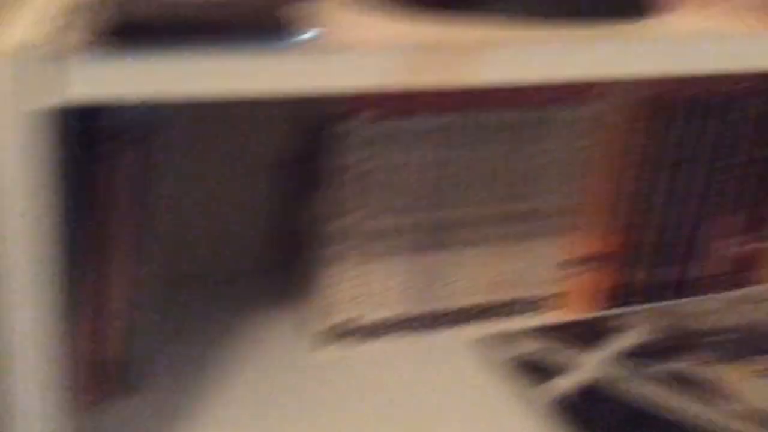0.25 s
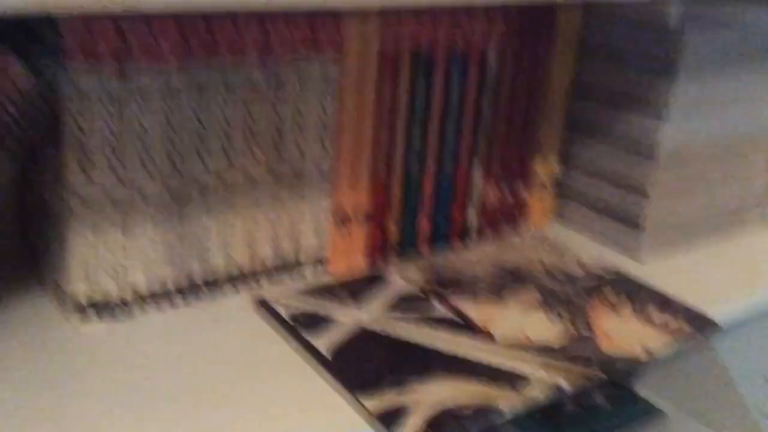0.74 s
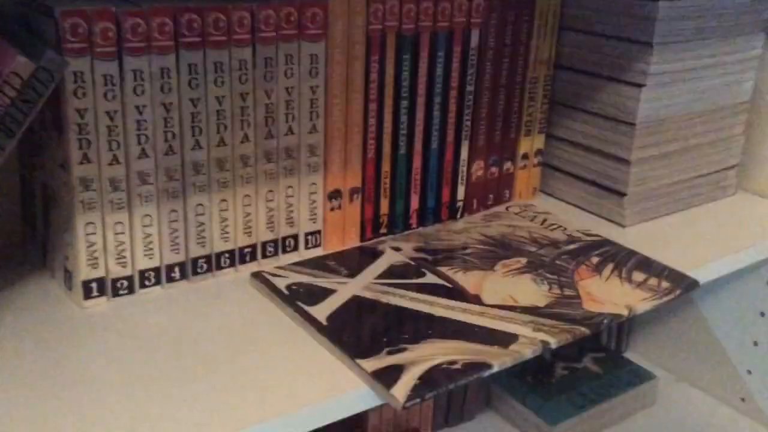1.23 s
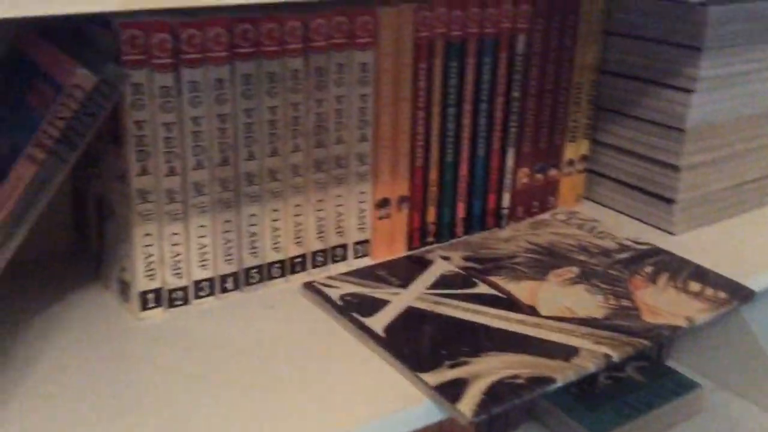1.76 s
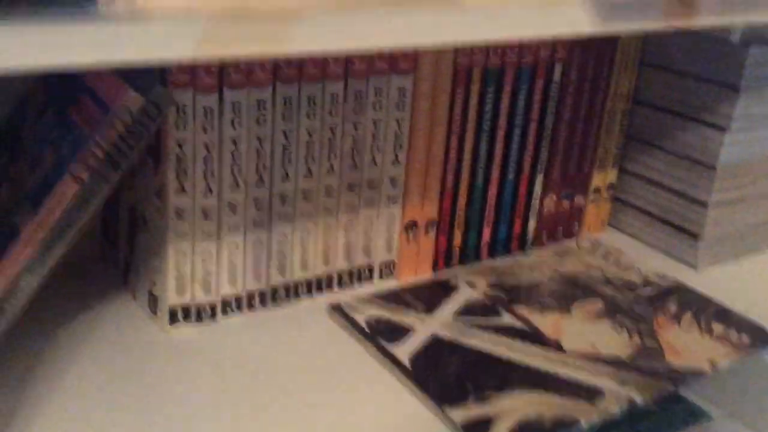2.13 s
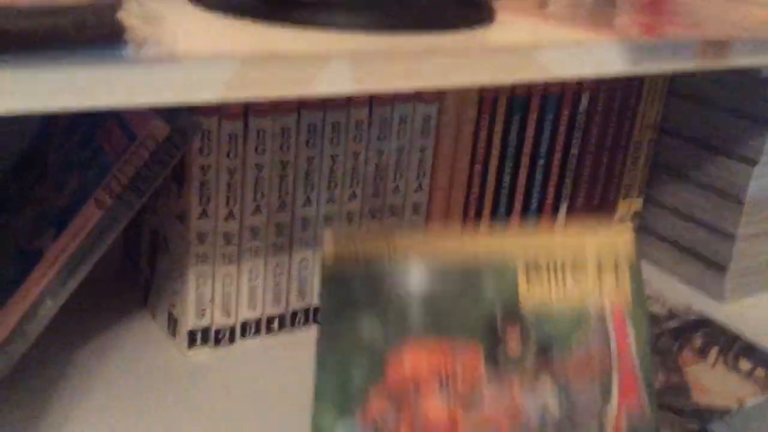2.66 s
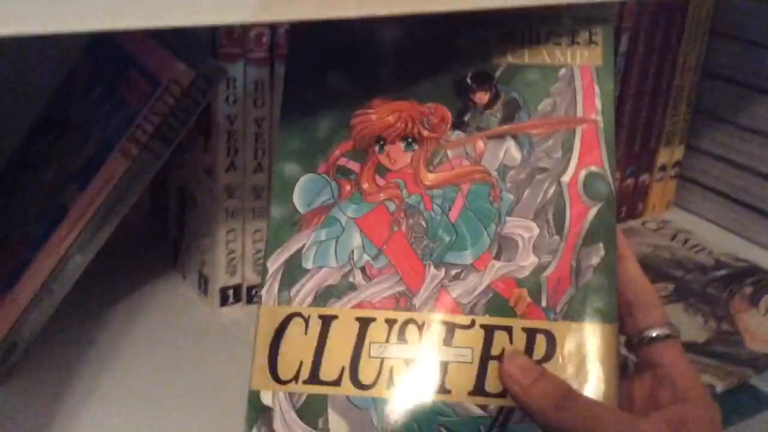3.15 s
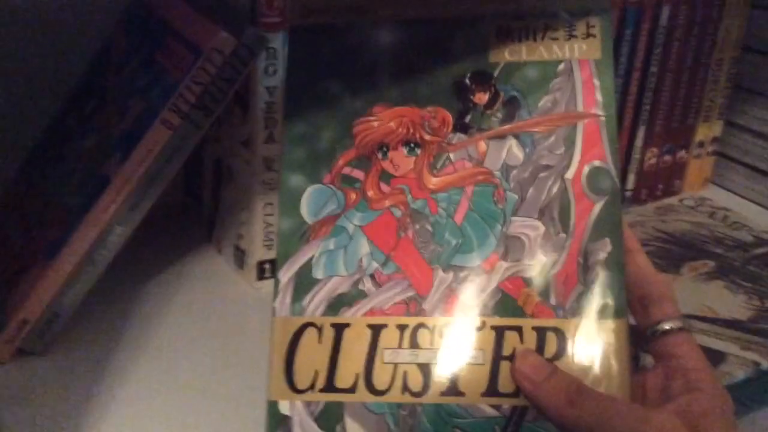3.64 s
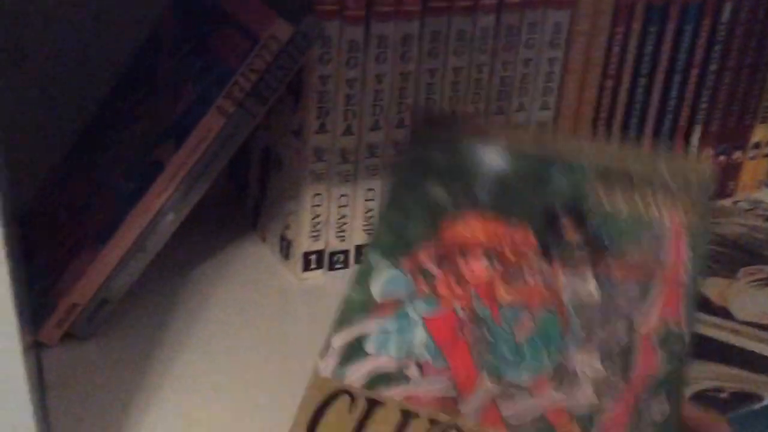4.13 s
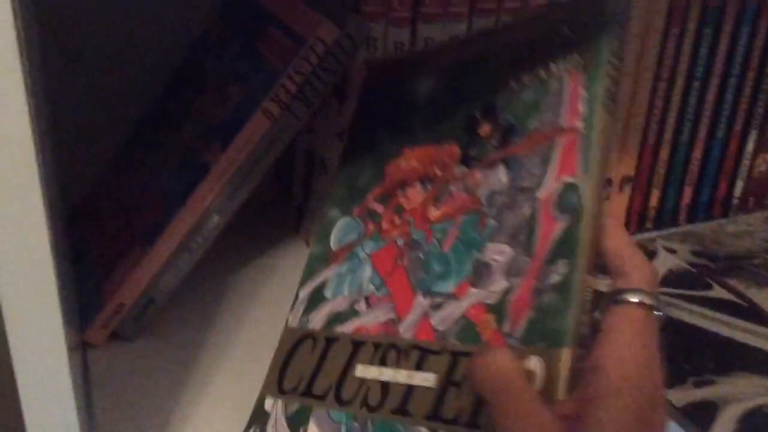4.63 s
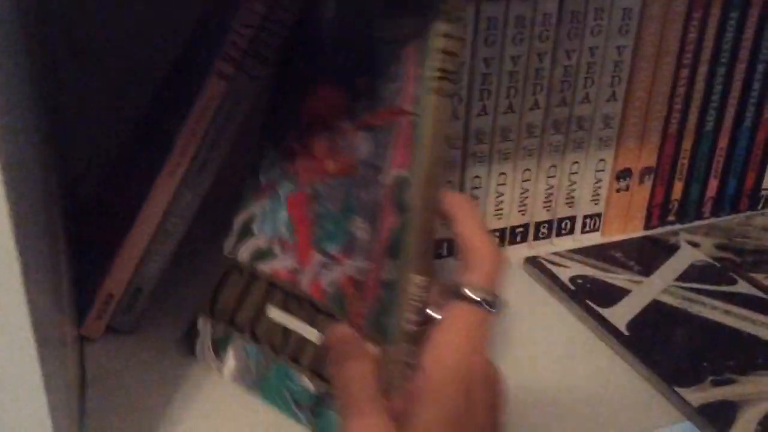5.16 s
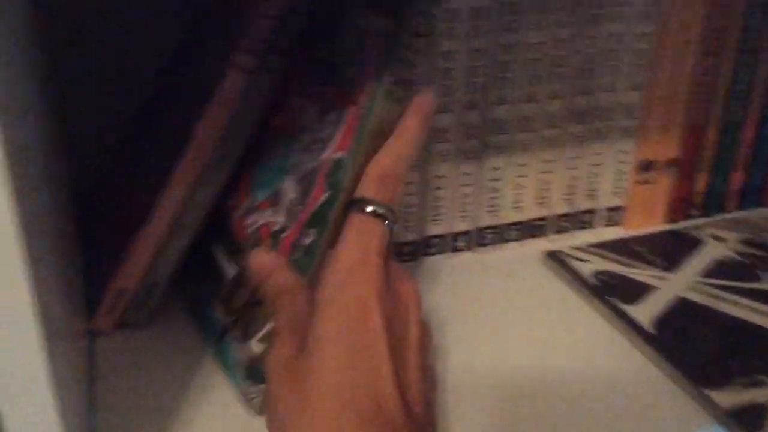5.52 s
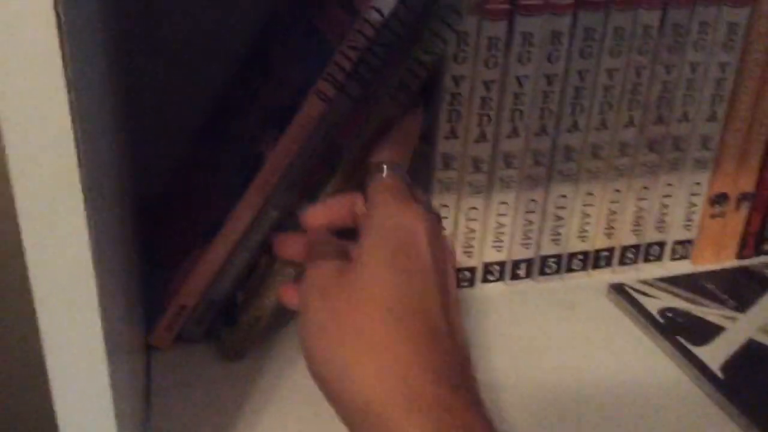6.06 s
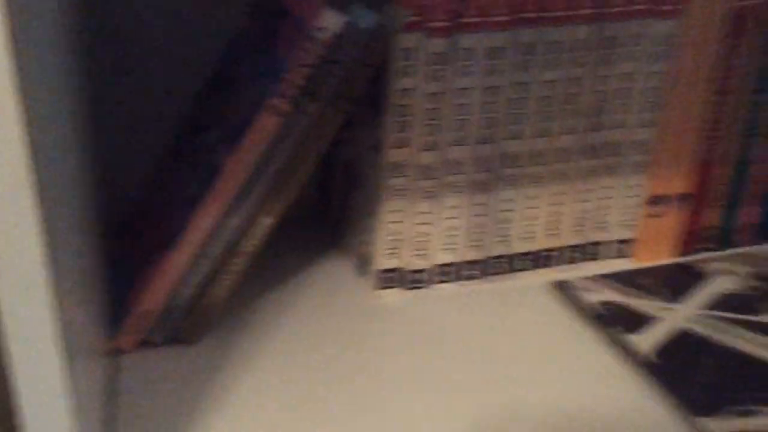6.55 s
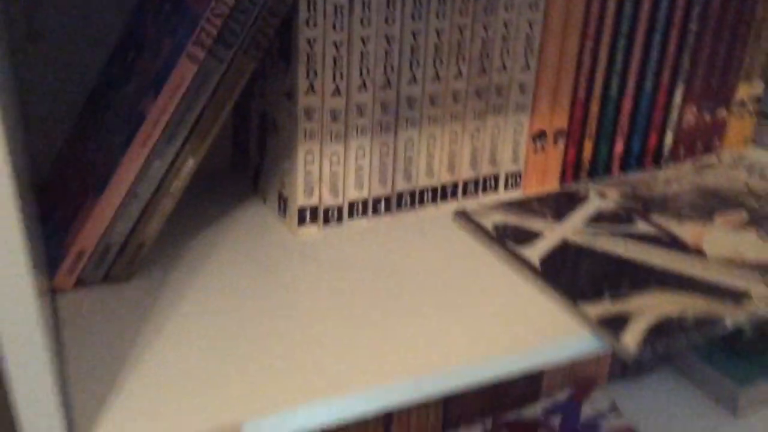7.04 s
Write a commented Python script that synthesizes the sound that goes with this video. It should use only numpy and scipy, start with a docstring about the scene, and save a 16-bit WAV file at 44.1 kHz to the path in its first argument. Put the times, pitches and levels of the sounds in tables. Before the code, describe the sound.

A book lands with a hard woody knock on a shelf, then faint cover creaks, clicks and grainy paper sliding in a quiet room.

```python
"""Paperbacks in a shelf compartment, close to a hand-held camera in a quiet room.
A book is put down with a knock, a damped swing plus scuffing noise that rings the shelf, and its cover clicks.
Another is gripped with a creak, stick-slip pulses through cover resonances, over the dull noise of skin.
It is set on the board and pushed in beside its neighbours, grainy paper noise with tiny catches and clicks.
Throughout, low damped thumps are the hand bumping the camera, over room rumble, a low drone and hiss."""
import sys
import numpy as np
from scipy import signal
from scipy.fft import rfft, irfft, next_fast_len
from scipy.io import wavfile
from scipy.ndimage import uniform_filter1d, map_coordinates

SR = 44100
rng = np.random.default_rng(int(sys.argv[2]) if len(sys.argv) > 2 else 0)


def waveform_to_disk(signal):
    """Save audio, clipped to [-1, 1], as 16-bit WAV at the path in sys.argv[1]."""
    frames = np.transpose(np.atleast_2d(signal))
    scaled = np.clip(frames, -1, 1) * 32767
    samples = np.round(scaled).astype(np.int16)
    wavfile.write(sys.argv[1], SR, samples)


N = 321489  # length in samples


def amp(db):
    """Decibels to gain."""
    return 10 ** (np.asarray(db) / 20)


def unit(x):
    """Scaled to rms 1."""
    return x / np.sqrt(np.mean(x ** 2) + 1e-20)


def along(points, hz):
    """(frequency [Hz], value) points read on a log frequency axis."""
    f, v = np.transpose(points)
    return np.interp(np.log(hz + 1), np.log(f + 1), v)


def curve(rows, outside=None):
    """(time [s], value) rows joined by straight lines, one value per sample."""
    return np.interp(np.arange(N) / SR, *np.transpose(rows), left=outside, right=outside)


STROKE_ROUNDNESS = 0.63  # power of the half sine; below 1 it is fuller


def strokes(rows):
    """Gain of (start [s], length [s], level [dB]) strokes that swell and ebb as the hand moves."""
    t = np.arange(N) / SR
    gain = np.zeros(N)
    for start, length, db in rows:
        progress = np.clip((t - start) / length, 0, 1)
        gain += amp(db) * np.abs(np.sin(np.pi * progress)) ** STROKE_ROUNDNESS
    return gain


def wobble(rate, size=N):
    """A smooth random curve, rate knots a second."""
    knots = rng.standard_normal(size // 50)
    return map_coordinates(knots, [np.arange(size) * rate / SR])


def filtered(x, response):
    """x times a complex response of frequency."""
    m = next_fast_len(len(x) + SR // 4)  # padded so that tails do not wrap round
    return irfft(rfft(x, m) * response(np.fft.rfftfreq(m, 1 / SR)), m)[:len(x)]


def resonance(f, hz, width):
    """Causal response of one resonance."""
    return 1j * f * width / (hz * hz - f * f + 1j * f * width)


def coloured(x, spectrum, tilt=0):
    """x given a spectrum, tilted above 1 kHz in dB per octave, at rms 1."""
    def response(f):
        return amp(along(spectrum, f) + tilt * np.log2(np.maximum(f, 1000)))
    return unit(filtered(x, response))


def add(track, s, sound):
    """Mix a sound into the track at s seconds."""
    part = track[max(round(s * SR), 0):][:len(sound)]
    part += sound[:len(part)]


def blow(db, hz, t60, scuff_db, soft_cycles, scuff_reach):
    """A heavily damped swing with a dull scuff of noise around its pitch."""
    t = np.arange(SR // 4) / SR
    shape = (1 - np.exp(-t * hz / soft_cycles)) * amp(-60 * t / t60)

    def dull(f):
        return resonance(f, hz, hz) / (1 + (f / (scuff_reach * hz)) ** 4)

    scuff = unit(filtered(rng.standard_normal(len(t)), dull))
    swing = np.sin(2 * np.pi * hz * t)
    return amp(db) * shape / shape.max() * (swing + amp(scuff_db) * scuff)


# a book meets the board or another book:
# (time [s], level [dB], pitch [Hz], scuff against swing [dB], t60 [s])
BOOK_KNOCKS = [(0.395, -44.5, 466, -1.5, 0.03), (0.489, -36, 330, 0, 0.0094),
               (0.491, -51.5, 887, -3, 0.088), (0.502, -45, 630, -3, 0.088),
               (0.658, -24.5, 522, -11, 0.011), (0.658, -24, 227, -2, 0.034), (0.711, -9, 379, -44, 0.019),
               (0.7171, -10.5, 337, -40, 0.015), (0.712, -40, 857, -11, 0.09),
               (0.736, -30.5, 528, -9, 0.047), (0.752, -28, 382, -12, 0.057),
               (0.797, -45.5, 494, -10, 0.064), (1.246, -63.5, 590, 3.5, .04), (1.776, -59, 346, -8, 0.027),
               (1.981, -56, 537, -11, 0.033), (2.31, -53, 417, -3, 0.015), (2.341, -60, 340, -12, 0.015),
               (2.656, -62, 550, 2, 0.012), (3.129, -60.5, 384, -5, 0.017), (3.22, -57.5, 405, -3, 0.013),
               (3.665, -56, 494, -7.5, 0.07), (4.227, -55.5, 297, -5, 0.17), (4.461, -68, 389, -8, 0.025),
               (4.497, -55, 743, 2, 0.017), (4.572, -63, 410, -1.5, 0.016), (4.61, -66, 407, -0.5, .018),
               (4.717, -52, 327, -13, 0.075), (4.744, -64, 480, 6, 0.022),
               (4.8268, -47.5, 1270, -5.5, 0.042), (4.828, -40.5, 656, -6, 0.018),
               (4.8333, -28.5, 286, -6.5, 0.022), (4.839, -46, 420, -2, 0.064), (5.199, -58, 386, 2, 0.018),
               (5.313, -63, 306, -6, 0.0093), (5.455, -45, 229, -4.5, 0.039), (5.463, -59, 850, 5, 0.029),
               (5.606, -39.5, 284, -10.5, .05), (5.707, -48.5, 1080, 0.5, 0.017),
               (5.997, -48, 292, -17, 0.06), (6.434, -62.5, 400, 4, 0.035),
               (6.731, -53.5, 1095, -8.5, 0.012), (6.7364, -55, 1287, -9, .02),
               (6.782, -69.5, 1296, -0.5, 0.034)]
SHELF_DB = -64.5  # feed of the compartment's ring
BOARD_LOW_HZ = 158.6  # the board radiates little below this


def knocks():
    """Books land; the compartment rings on after each blow."""
    out = np.zeros(N)
    for s, db, hz, scuff_db, t60 in BOOK_KNOCKS:
        thud = blow(db, hz, t60, scuff_db, soft_cycles=0.68, scuff_reach=1.3)
        add(out, s, thud)
        add(out, s, amp(SHELF_DB) * signal.fftconvolve(thud, shelf_ring()))

    width = BOARD_LOW_HZ * np.sqrt(2)
    # resonance times a rising slope makes a smooth low cut
    return filtered(out, lambda f: resonance(f, BOARD_LOW_HZ, width) * 1j * f / width)


# modes of the shelf compartment: (pitch [Hz], level before scatter [dB], t60 [s])
SHELF_MODES = [(282, -5.5, .24), (324, 1.5, 0.22), (371.5, -6.5, 0.067), (432, -5.5, 0.18),
               (463.8, -1.5, 0.24), (509, -4.5, .2), (561, 3, 0.15), (562, 3, 0.2), (840, -6, 0.17),
               (1022, -8, 0.13), (1115, -4, 0.16), (1330, -1, .15)]
RING_SCATTER_DB, RING_WANDER_RAD, RING_WANDER_PER_S = 2, .8, 55  # spread, phase wander, knots a second


def shelf_ring():
    """Each blow rings the compartment a little differently; the loose books on it unsettle every mode."""
    t = np.arange(SR // 2) / SR
    ring = np.zeros(len(t))
    for hz, db, t60 in SHELF_MODES:
        fade = amp(db + RING_SCATTER_DB * rng.standard_normal() - 60 * t / t60)
        wander = RING_WANDER_RAD * wobble(RING_WANDER_PER_S, size=len(t))
        ring += fade * np.cos(2 * np.pi * hz * t + wander)
    return ring


def grains(size, spread_db):
    """Tiny fibre slips of widely scattered strength."""
    strength = np.repeat(rng.standard_normal(size // 16 + 1), 16)[:size]
    return rng.standard_normal(size) * amp(spread_db * strength)


# spectrum of paper friction: (frequency [Hz], density [dB per Hz])
PAPER_SPECTRUM = [(150, -34), (500, -5), (1000, -1), (2000, -2.5), (3300, 3), (6200, -3), (9000, -1.5),
                  (12000, -3), (15000, -1)]


def paper(size, spread_db, tilt, low_hz):
    """Grainy paper noise; a small contact patch radiates little below low_hz."""
    contact = filtered(grains(size, spread_db), lambda f: f ** 3 / np.hypot(f ** 3, low_hz ** 3))
    return coloured(contact, PAPER_SPECTRUM, tilt)


# a stiff cover or page edge snaps:
# (time [s], relative level [dB], tilt [dB per octave], low corner [Hz], t60 of the body [s])
COVER_CLICKS = [(0.579, -26.5, 0.5, 1890, 0.014), (0.696, -34, 5, 2490, 0.016),
                (0.7111, -22, -5.5, 1100, 0.023), (1.244, -49.5, -6, 3930, 0.035),
                (3.169, -53.5, -5, 4040, .025), (3.787, -45.5, -2, 1720, 0.029),
                (3.825, -49.5, -1.5, 790, 0.035), (3.831, -52, -1, 1473, .023),
                (4.096, -46, -1, 1490, 0.013), (4.128, -51, -12, 687, 0.02), (4.219, -54.5, -14, 590, .03),
                (4.146, -51, 1.5, 3500, .04), (4.291, -41.5, -9.5, 2100, .015),
                (6.2925, -42, -5.5, 4030, .012), (6.3445, -48, -3, 1510, .012),
                (6.4365, -39.5, -2, 600, .02), (4.827, -46.5, -2, 600, 0.029), (6.134, -54, -3.5, 926, .02),
                (6.445, -48.5, 3, 1500, .023), (6.453, -36, 9.5, 2050, 0.036)]
SNAP_DB, SNAP_T60_S = 4, .004  # the sharp front, against the body
WALL_ECHO_S, WALL_ECHO_DB = 0.0026, -12


def clicks():
    """Each snap is a sharp crack that the near wall of the compartment throws back."""
    out, t = np.zeros(N), np.arange(SR // 8) / SR
    for s, db, tilt, low_hz, t60 in COVER_CLICKS:
        body = amp(-60 * t / t60)
        snap = amp(SNAP_DB - 60 * t / SNAP_T60_S)
        noise = unit((body + snap) * paper(len(t), spread_db=5, tilt=tilt, low_hz=low_hz))
        body_rms = np.sqrt(np.mean(body ** 2))  # a longer click carries more energy
        crack = amp(db - 4.5) * body_rms * noise
        add(out, s, crack)
        add(out, s + WALL_ECHO_S, amp(WALL_ECHO_DB) * crack)
    return out


# a finger or cover brushes over paper:
# (time of peak [s], level [dB], last 20 dB of rise [s], tilt [dB per octave], low corner [Hz])
PAPER_BRUSHES = [(0.505, -60, 0.023, -4, 2900), (0.62, -65.5, 0.1, 3.5, 2000), (0.704, -46, 0.05, -3, 1360),
                 (0.765, -57, 0.067, -1.5, 500), (1.265, -68.5, 0.049, -6, 3770),
                 (2.47, -68, 0.1, -13, 1490), (3.184, -55, 0.021, 0.5, 4046), (3.215, -68, 0.041, -5, 4000),
                 (3.301, -74.5, 0.046, -2, 3800), (4.11, -68.5, 0.1, 2, 3462),
                 (4.152, -43.5, .014, 6.5, 2540), (4.227, -57, 0.025, -3, 502),
                 (5.172, -56, 0.045, -6.5, 2590), (5.283, -60, 0.029, -8, 2500),
                 (5.562, -59, 0.036, -7, 3140), (6.244, -51, 0.061, 2, 1270),
                 (6.293, -53.5, 0.056, 2.5, 947), (6.387, -65, 0.017, -4, 490),
                 (6.437, -46.5, 0.0088, 0, 816), (6.449, -42, .007, 14, 12000),
                 (6.508, -60.5, 0.02, 4.5, 2060), (6.542, -58, 0.013, 0, 1790)]
BRUSH_FADE = 3.7  # t60 of a brush over its rise time


def brushes():
    """Short grainy strokes; the slower one swells, the slower it dies away."""
    out, t = np.zeros(N), np.arange(-SR // 8, SR // 4) / SR
    for s, db, rise, tilt, low_hz in PAPER_BRUSHES:
        shape_db = np.where(t < 0, 20 * t / rise, -60 * t / (BRUSH_FADE * rise))
        noise = paper(len(t), spread_db=3.0, tilt=tilt, low_hz=low_hz)
        add(out, s + t[0], amp(db + shape_db) * noise)
    return out


def patchy(x, depth_db):
    """Colour that drifts from band to band as the contact moves."""
    z = signal.stft(x, nperseg=512)[2]
    field = uniform_filter1d(rng.standard_normal(z.shape), size=9, axis=0)  # across bands
    field = uniform_filter1d(field, size=14, axis=1)  # along time
    return unit(signal.istft(z * amp(depth_db * unit(field)), nperseg=512)[1][:N])


# a cover slides lightly on another: (start [s], length [s], relative level [dB])
LIGHT_SLIDES = [(0.1, 0.53, -69), (1.35, 0.086, -71.5), (1.455, 0.068, -69.5), (1.668, 0.063, -69.5),
                (1.76, 0.42, -78.5), (2.11, 0.26, -73.5), (2.36, 0.3, -66)]
# the book is pushed in beside its neighbours:
# (time [s], friction level [dB], lift of the bright patch [dB])
BOOK_PUSH = [(4.37, -86, -22.5), (4.432, -68.5, -10.5), (4.62, -71, -2.5), (4.812, -66.5, -15),
             (4.87, -73, 0), (4.915, -68.5, 4), (4.964, -64.5, 2.5), (4.998, -70.5, 4.5),
             (5.184, -60.5, 5.5), (5.228, -63, 6), (5.286, -58.5, 3), (5.344, -62, 3), (5.5, -61, 1.5),
             (5.565, -61, 4.5), (5.608, -57, 0.5), (5.632, -72.5, 10.5), (5.743, -69, 4), (5.938, -57.5, 5),
             (6.042, -64.5, 10), (6.08, -71, 0), (6.12, -78, 7)]
DULL_DB, BRIGHT_DB, DRIFT_DB = -3.5, -1, .8  # the two patches of contact, and their drift
CATCH_DB = -9  # page edges, in the same mix


def slides():
    """Paper friction from a dull and a bright patch of contact, with page edges catching in it."""
    push = amp(curve([(s, db) for s, db, _ in BOOK_PUSH], outside=-np.inf))
    level = amp(-2.5) * strokes(LIGHT_SLIDES) + push
    bright_db = curve([(s, db) for s, _, db in BOOK_PUSH], outside=0)

    dull = patchy(coloured(grains(N, spread_db=-1.5), PAPER_SPECTRUM, tilt=-1.3), depth_db=1.5)
    dull *= amp(DULL_DB + DRIFT_DB * wobble(20))
    bright = patchy(coloured(grains(N, spread_db=-1.5), PAPER_SPECTRUM, tilt=0.87), depth_db=2.5)
    bright *= amp(BRIGHT_DB + bright_db + DRIFT_DB * wobble(14))

    flutter = amp(1.6 * wobble(130))
    return level * flutter * (dull + bright + amp(CATCH_DB) * catches())


CATCHES_PER_S, CATCH_HZ, CATCH_CYCLES = 260, 2300, 6  # rate, middle pitch, cycles to fall 60 dB


def catches():
    """Page edges catch and let go: tiny uneven ticks, each with its own pitch and strength, at rms 1."""
    draws = rng.random((round(CATCHES_PER_S * N / SR), 3))
    when, pitch, strength = draws.T[:, :, None]
    n = np.arange(SR // 150)
    cycles = CATCH_HZ * 2 ** (3 * (pitch - .5)) * n / SR  # pitches span three octaves
    ticks = amp(20 * strength) * amp(-60 * cycles / CATCH_CYCLES) * np.sin(2 * np.pi * cycles)
    places = (when * N).astype(int) + n
    return unit(np.bincount(places.ravel(), ticks.ravel(), N)[:N])


# a fingertip sticks and slips on the glossy cover:
# (time [s], length [s], relative level [dB], slip rate [per s], glide [share of the rate],
#  cover pitch [factor], scrape against slips [dB])
CREAK_RUBS = [(1.521, 0.026, -63, 320, 0.097, 0.78, 0.5), (1.534, 0.022, -63, 600, -0.14, 1, -1),
              (1.648, 0.019, -61, 630, -0.11, 0.89, -13.5), (1.671, 0.014, -64.5, 340, -.05, 1.26, -11),
              (1.694, 0.031, -70, 310, -0.081, 0.81, -7), (1.726, 0.024, -54, 610, -0.057, 0.74, -11),
              (1.771, 0.025, -65.5, 310, 0.036, 0.78, 5), (1.792, 0.028, -65, 150, -0.025, 0.77, 3),
              (1.806, 0.048, -72, 410, 0.086, 1.17, -6), (1.937, 0.055, -74.5, 310, -0.072, 1, 5),
              (2.255, 0.016, -60.5, 375, -0.07, 1.29, -4), (2.413, 0.016, -51, 308, -.03, 1.1, -6),
              (2.425, 0.041, -46, 338, -.13, 1.16, -9), (2.458, 0.028, -53.5, 308, -.02, 1.12, -4),
              (2.484, 0.033, -50, 322, .08, 1.04, -7), (2.524, 0.0041, -48.5, 360, -0.031, 1.25, -3),
              (2.531, 0.11, -66, 190, -0.065, 1.3, 0), (2.568, 0.0089, -52.5, 640, -0.033, 1.38, -7),
              (2.585, 0.0051, -52.5, 460, -0.074, 1.37, -5), (2.597, 0.0082, -51.5, 485, -0.084, 1.2, -9),
              (2.606, 0.016, -57, 440, -0.2, 1.05, -11)]
# resonances of the bent cover: (pitch before the rub's factor [Hz], width [Hz], level [dB])
COVER_MODES = [(618, 120, 9.5), (1052, 480, 7), (1312, 294, 5), (1590, 180, -8)]
SLIP_JITTER = 0.015  # unsteadiness, as a share of the slip rate


def creak():
    """Short rubs, runs of slips gliding in rate, ring the cover; even slips squeak, a scrape roughens them."""
    out, t = np.zeros(N), np.arange(SR // 5) / SR
    for s, length, db, rate, glide, pitch, scrape_db in CREAK_RUBS:
        progress = np.minimum(t / length, 1)
        jitter = SLIP_JITTER * wobble(150, size=len(t))
        speed = rate * np.exp(jitter + glide * (progress - .5))
        # one pulse each time the count of slips steps up
        slips = np.diff(np.floor(np.cumsum(speed) / SR), prepend=-1)
        slips = slips * amp(1.6 * wobble(430, size=len(t)))
        scrape = amp(scrape_db) * rng.standard_normal(len(t))
        drive = (unit(slips) + scrape) * np.sin(np.pi * progress)

        def touched_cover(f):
            modes = sum((-1) ** k * amp(g) * resonance(f, hz * pitch, width)  # alternating sign
                        for k, (hz, width, g) in enumerate(COVER_MODES))
            return modes / (1 + (f / 3500) ** 2)  # the soft fingertip passes on little treble

        add(out, s, amp(db + 6.5) * filtered(drive, touched_cover))
    return out


# the gripping hand shifts its hold: (start [s], length [s], level [dB])
GRIP_SHIFTS = [(0.2, 0.71, -67), (1.15, 1.04, -77), (2.2, 0.48, -70), (3.0, 1.28, -82), (4.35, 0.15, -66.5),
               (4.69, 0.27, -65.5), (5.2, 1.61, -73.5), (5.61, 0.12, -83), (5.96, 0.047, -82)]
# spectrum of skin on a book: (frequency [Hz], density [dB per Hz])
SKIN_SPECTRUM = [(100, -8.5), (220, -1.5), (500, 2), (900, -4), (1600, -17), (4000, -36)]


def grip():
    """Skin shuffles on the book in small dull bursts."""
    bursts = amp(5.5 * wobble(55))
    skin = coloured(rng.standard_normal(N), SKIN_SPECTRUM)
    return strokes(GRIP_SHIFTS) * unit(bursts * skin)


# the hand bumps the camera: (time [s], level [dB], pitch [Hz])
CAMERA_BUMPS = [(0.378, -38, 68), (0.427, -37.5, 132), (0.467, -33, 71.4), (0.488, -28, 100),
                (0.498, -34, 195), (0.525, -33.5, 158), (0.66, -19, 72), (0.958, -41, 101),
                (1.048, -48, 165), (1.177, -38.5, 182), (1.595, -57.5, 227), (1.883, -50, 201),
                (1.979, -53, 172), (2.284, -44.5, 133), (2.308, -49.5, 223), (2.38, -49, 204),
                (3.178, -44.5, 173), (3.204, -52.5, 192.4), (4.826, -34.5, 155.7), (4.984, -42.5, 119),
                (5.016, -47.5, 189), (5.314, -43.5, 99), (6.497, -42.5, 109.8), (6.511, -42, 178),
                (6.571, -50.5, 168), (6.644, -53, 115), (6.85, -52.5, 106.5), (6.928, -54, 99.7),
                (7.156, -52.5, 173)]
BUMP_CYCLES = 11.9  # swings until a bump has fallen 60 dB
CASE_LOW_HZ = 41  # the camera's case passes little below this


def bumps():
    """Dull thumps that travel through the camera's case; the lower ones last longer."""
    out = np.zeros(N)
    for s, db, hz in CAMERA_BUMPS:
        add(out, s, blow(db, hz, BUMP_CYCLES / hz, scuff_db=-15.5, soft_cycles=0.083, scuff_reach=2.1))
    return filtered(out, lambda f: 1j * f / (1j * f + CASE_LOW_HZ))


# spectrum of the room's rumble: (frequency [Hz], density [dB per Hz])
RUMBLE_SPECTRUM = [(15, -33.5), (28, -20), (48, -3), (110, 0.5), (150, -23), (190, -13), (270, -29.5),
                   (340, -22.5), (450, -29.5), (940, -36), (1500, -45.5), (3000, -89.5)]
# slow course of the rumble: (time [s], level before the swells [dB])
RUMBLE_COURSE = [(0.1, -56.5), (1.1, -57), (1.9, -59.5), (2.95, -59.5), (3.4, -63.5), (4.1, -62),
                 (5.5, -62), (6.6, -62), (7.29, -58.5)]
# spectrum of the microphone's hiss: (frequency [Hz], density [dB per Hz])
HISS_SPECTRUM = [(300, -5), (1500, -2), (3300, 0.5), (5000, -4.5), (6500, -4), (9000, 2.5), (12000, 0),
                 (15000, -3.5)]
RUMBLE_SPLIT_HZ = 120  # the rumble swells separately below and above this


def background():
    """Low room rumble whose two registers wander apart, a narrow drone in it, and microphone hiss."""
    noise = coloured(rng.standard_normal(N), RUMBLE_SPECTRUM)
    deep = filtered(noise, lambda f: 1 / (1 + (f / RUMBLE_SPLIT_HZ) ** 4))
    swelling = amp(3 * wobble(12)) * deep + amp(4.2 * wobble(17)) * (noise - deep)
    rumble = amp(curve(RUMBLE_COURSE)) * swelling

    drone = filtered(rng.standard_normal(N), lambda f: resonance(f, hz=101.1, width=60) ** 2)
    hiss = coloured(rng.standard_normal(N), HISS_SPECTRUM)
    return rumble + amp(-67.0) * unit(drone) + amp(-77.0) * hiss


# decay of the room: (frequency [Hz], t60 [s])
ROOM_DECAY = [(100, 0.21), (500, 0.3), (4000, 0.088), (14000, 0.023)]


def room(x):
    """The small room's tail is noise fading band by band; the highest treble dies first."""
    hz, t, z = signal.stft(rng.standard_normal(SR // 2), SR, nperseg=256)
    fade = amp(-60 * t / along(ROOM_DECAY, hz)[:, None])
    tail = signal.istft(z * fade, SR, nperseg=256)[1]
    return signal.fftconvolve(x, tail / np.linalg.norm(tail))[:N]


KNOCK_ROOM_DB, PAPER_ROOM_DB = -19, -12  # sends to the room


def scene():
    """The books in their room, and the hand on the camera."""
    blows = knocks()
    handling = clicks() + brushes() + slides() + creak() + grip()
    echo = room(amp(KNOCK_ROOM_DB) * blows + amp(PAPER_ROOM_DB) * handling)
    return (blows + handling + echo + background() + bumps())[None]


# resonances of the microphone port: (pitch [Hz], width [Hz], level [dB])
PORT_MODES = [(4803, 310, 6.5), (4970, 428, 10.5), (6720, 110, -6.5)]
TOP_HZ = 15600  # band limit


def record(dry):
    """The microphone port rings in the treble; nothing passes above the band limit."""
    def port(f):
        ringing = sum(amp(db) * resonance(f, hz, width) for hz, width, db in PORT_MODES)
        return (1 + ringing) * (f < TOP_HZ)
    return filtered(dry[0], port)[None]


dry = scene()
out = record(dry)
waveform_to_disk(out)
```